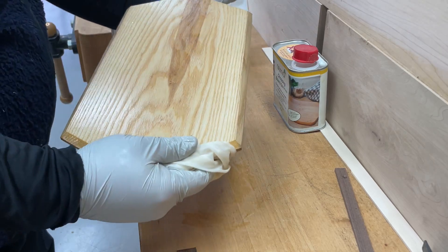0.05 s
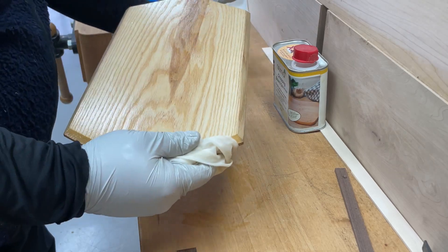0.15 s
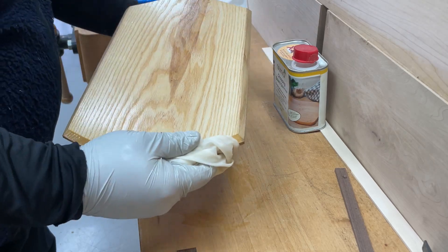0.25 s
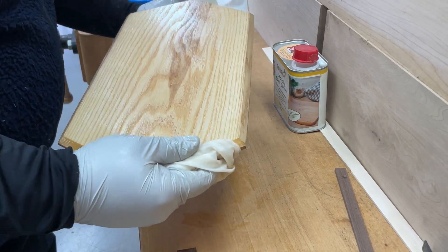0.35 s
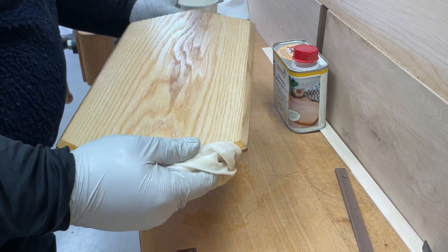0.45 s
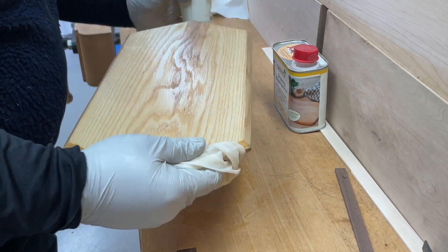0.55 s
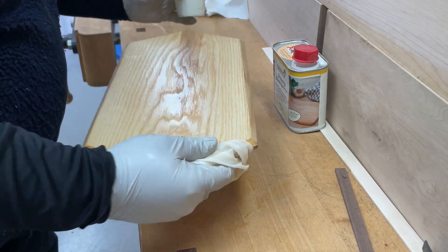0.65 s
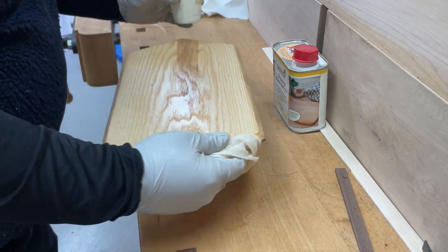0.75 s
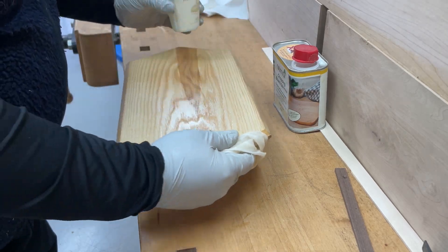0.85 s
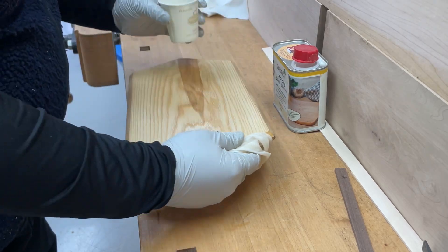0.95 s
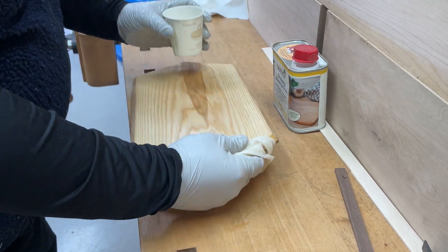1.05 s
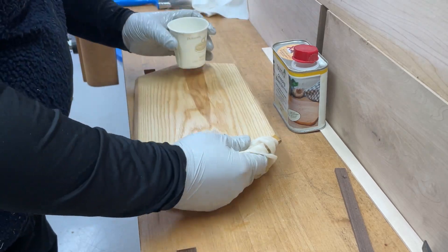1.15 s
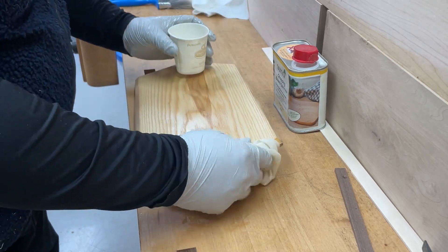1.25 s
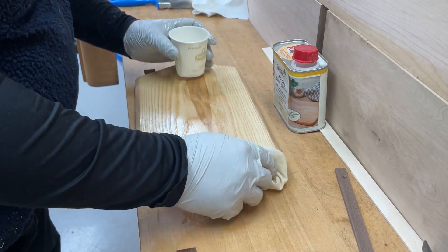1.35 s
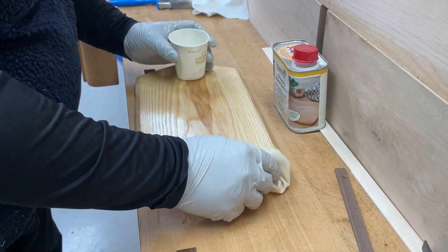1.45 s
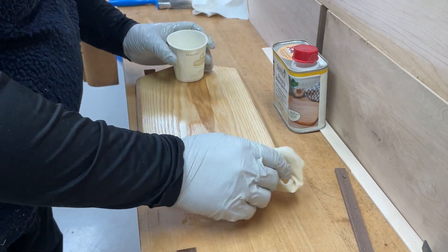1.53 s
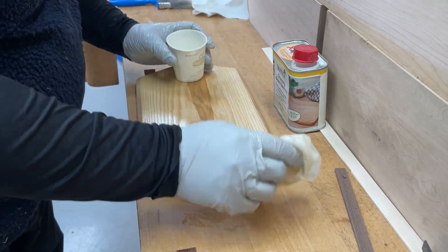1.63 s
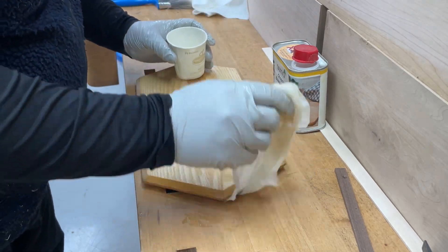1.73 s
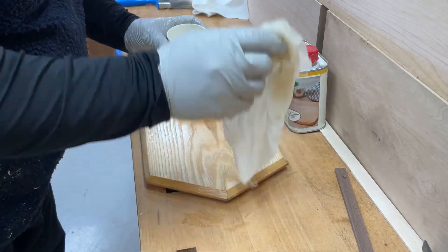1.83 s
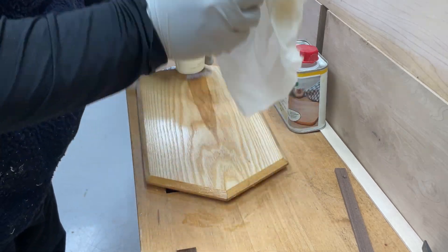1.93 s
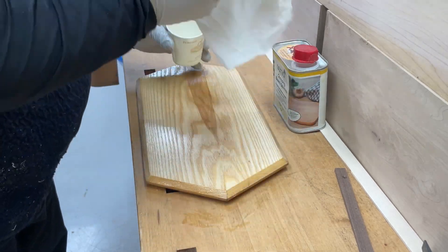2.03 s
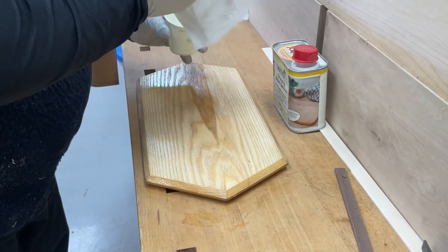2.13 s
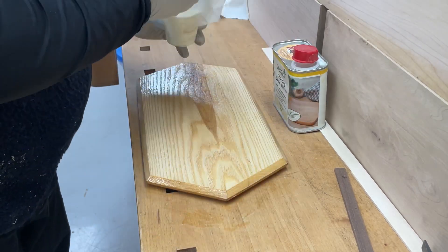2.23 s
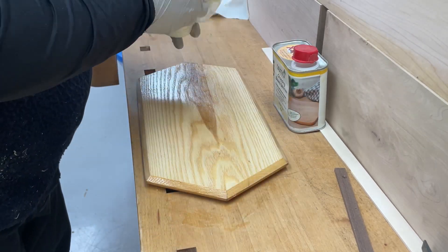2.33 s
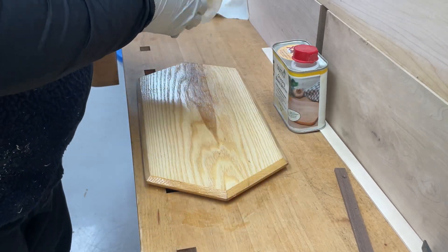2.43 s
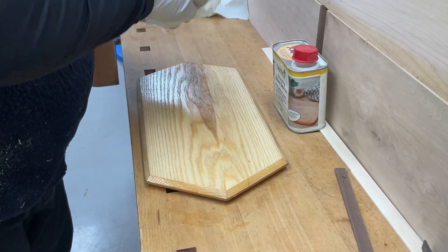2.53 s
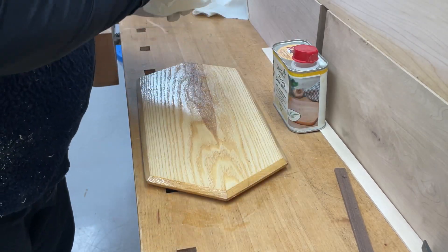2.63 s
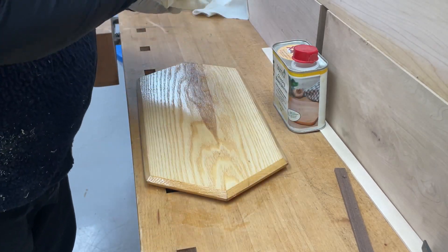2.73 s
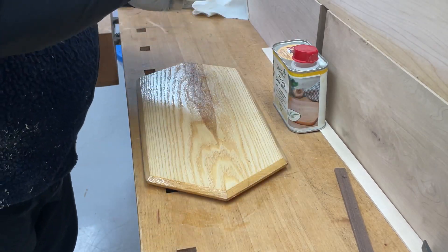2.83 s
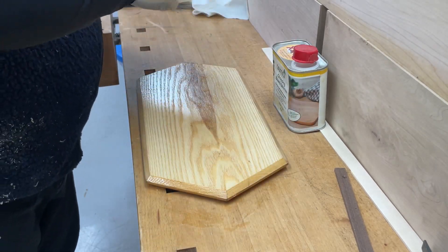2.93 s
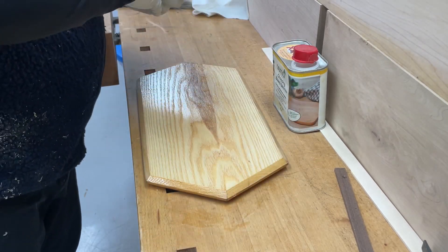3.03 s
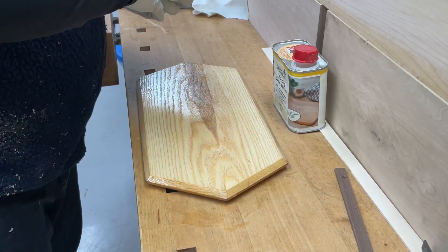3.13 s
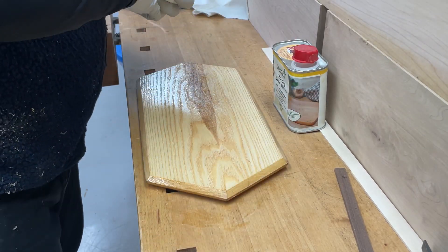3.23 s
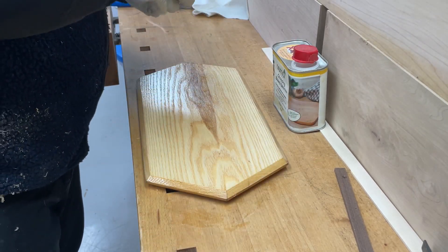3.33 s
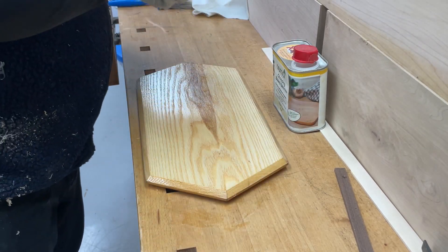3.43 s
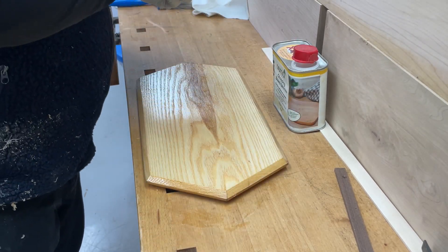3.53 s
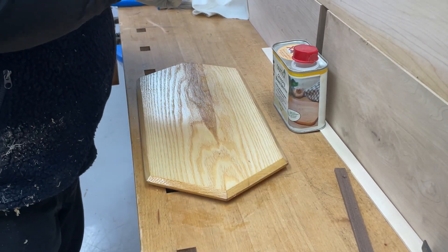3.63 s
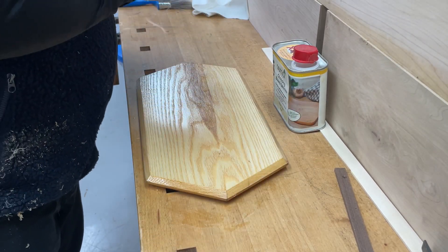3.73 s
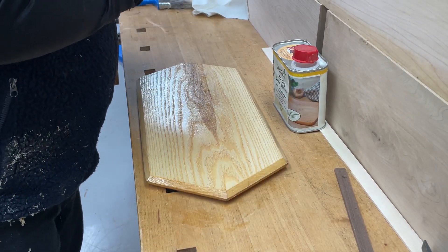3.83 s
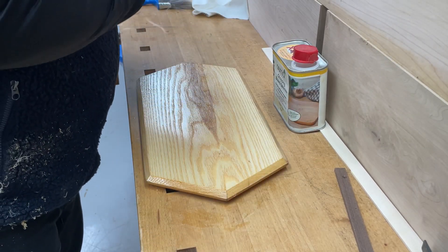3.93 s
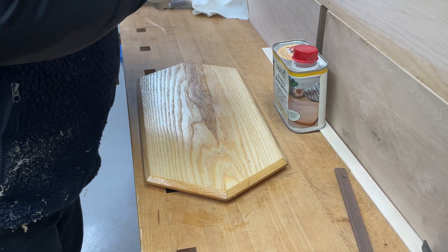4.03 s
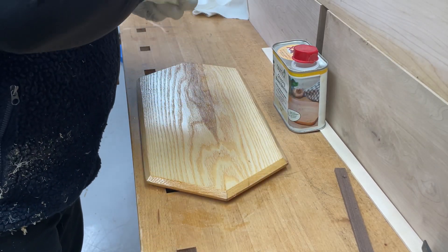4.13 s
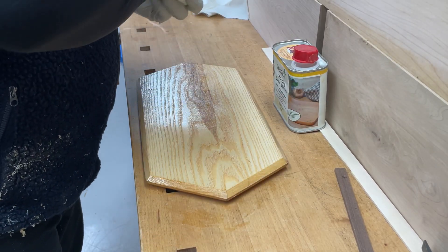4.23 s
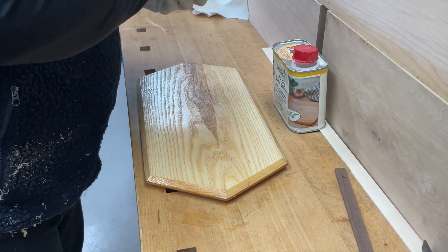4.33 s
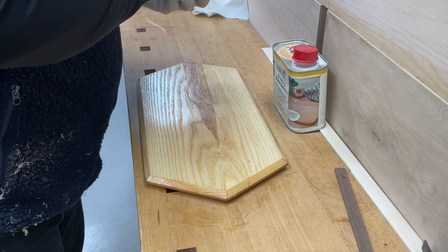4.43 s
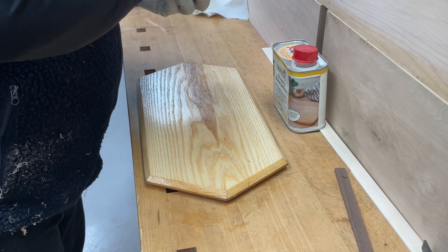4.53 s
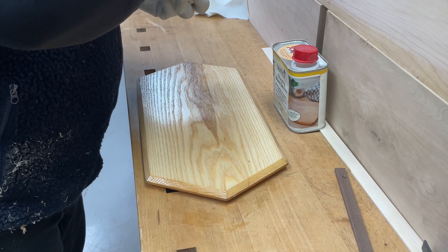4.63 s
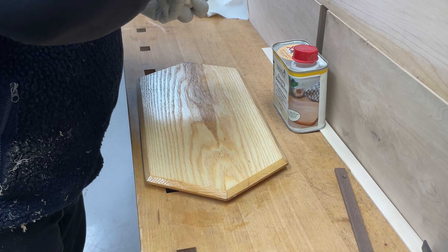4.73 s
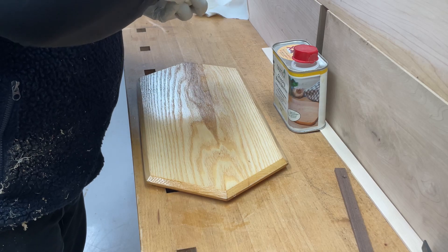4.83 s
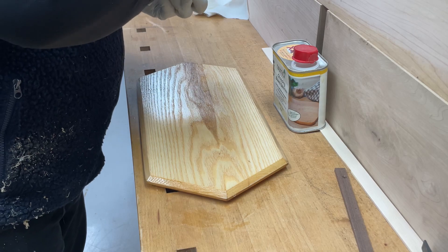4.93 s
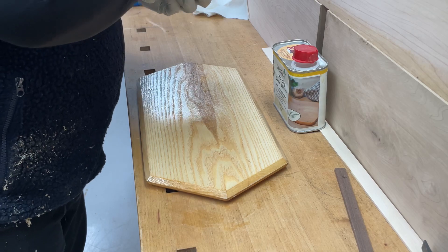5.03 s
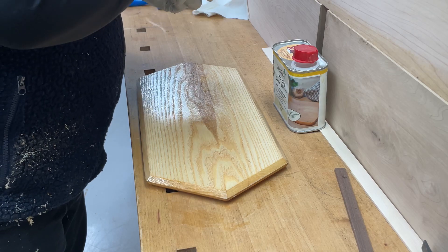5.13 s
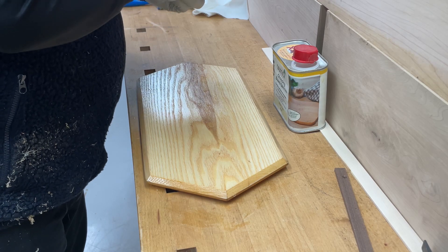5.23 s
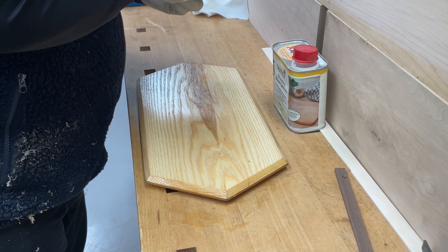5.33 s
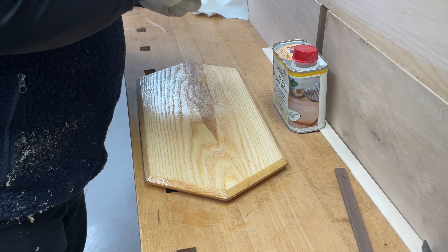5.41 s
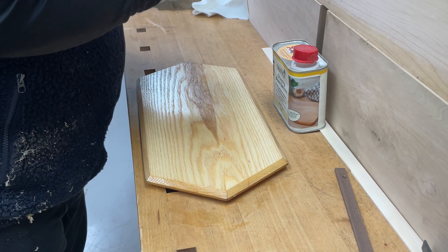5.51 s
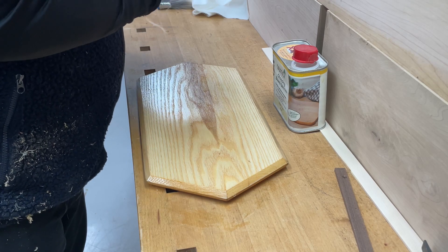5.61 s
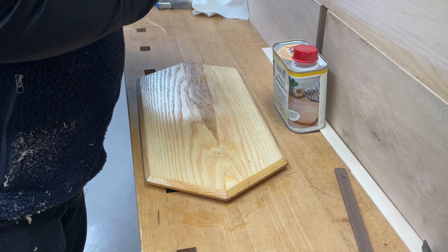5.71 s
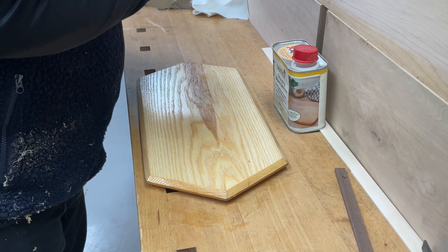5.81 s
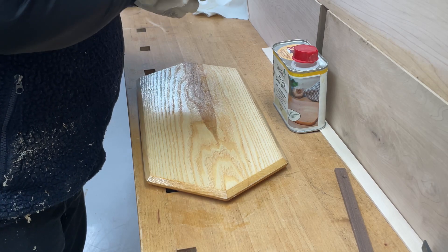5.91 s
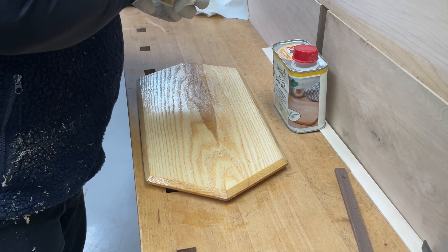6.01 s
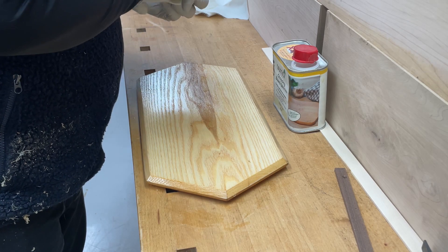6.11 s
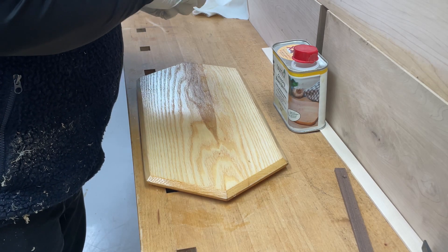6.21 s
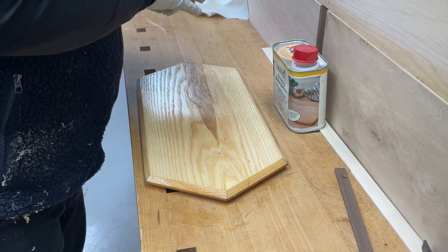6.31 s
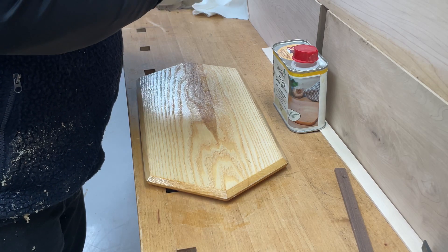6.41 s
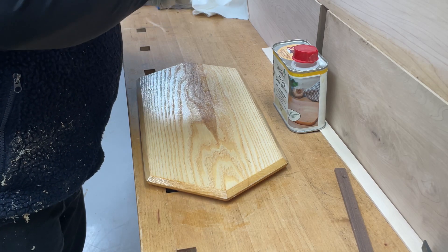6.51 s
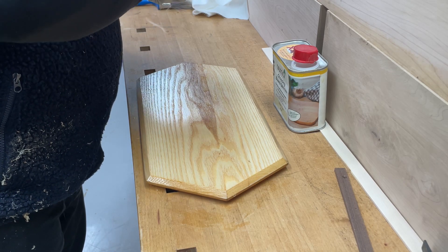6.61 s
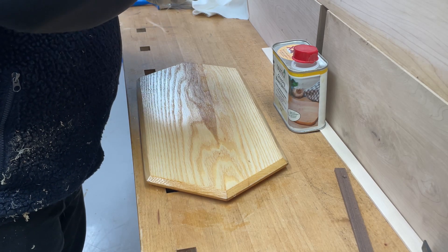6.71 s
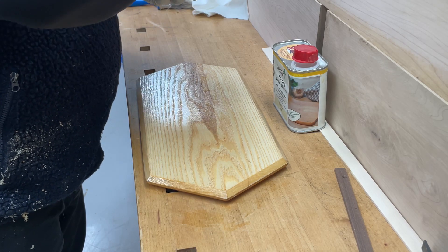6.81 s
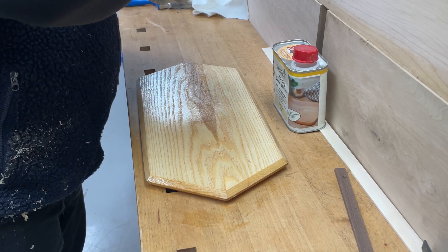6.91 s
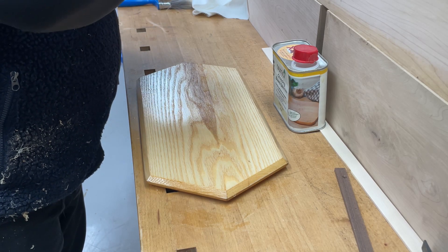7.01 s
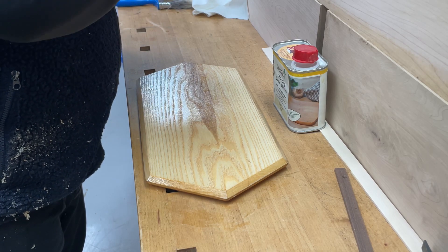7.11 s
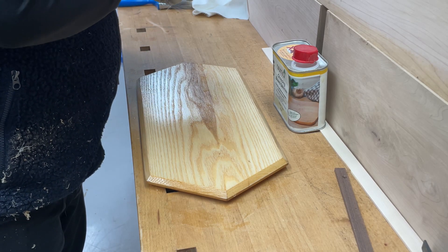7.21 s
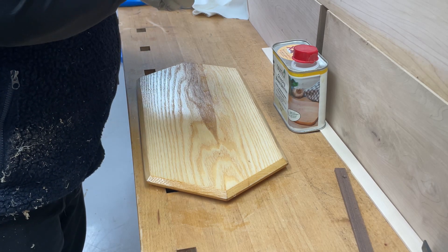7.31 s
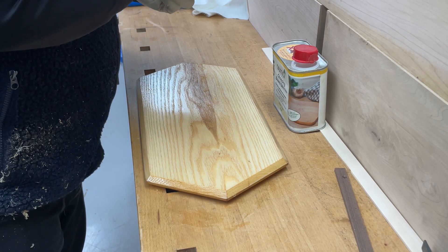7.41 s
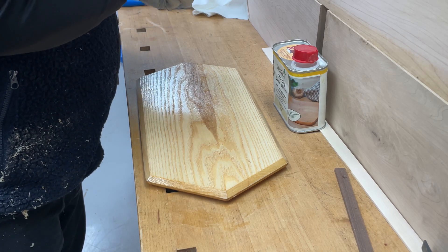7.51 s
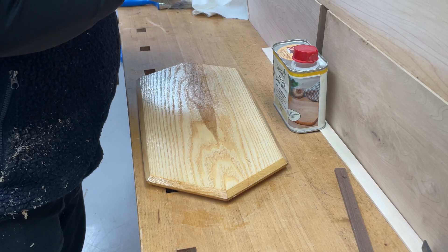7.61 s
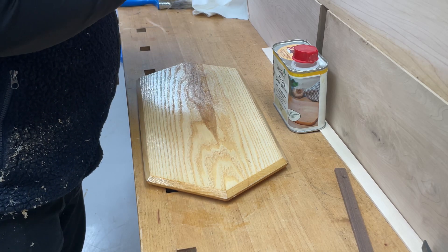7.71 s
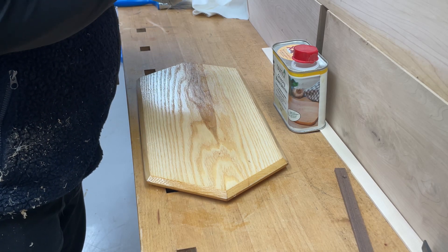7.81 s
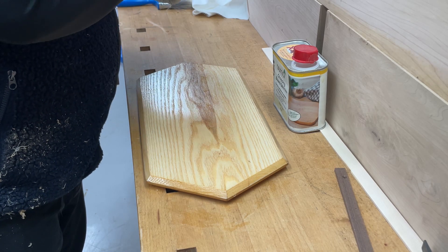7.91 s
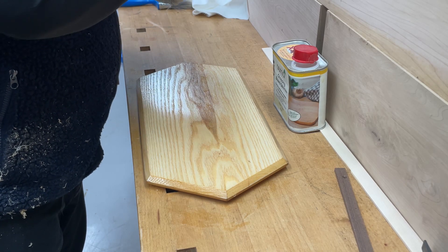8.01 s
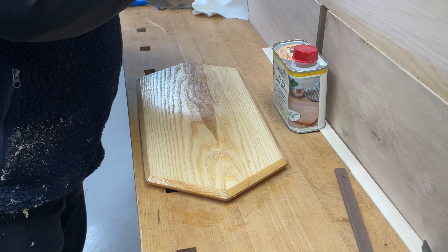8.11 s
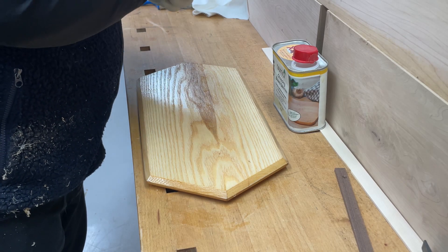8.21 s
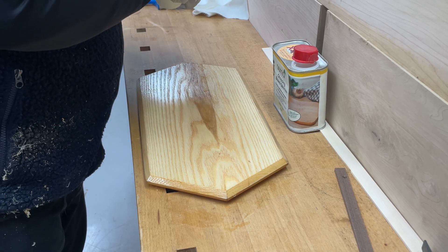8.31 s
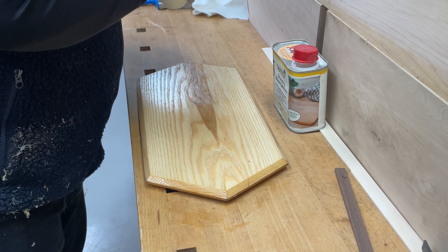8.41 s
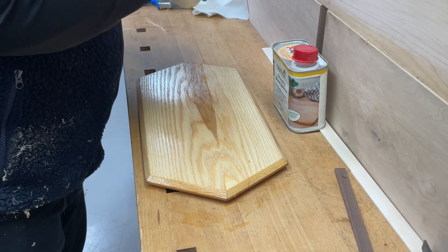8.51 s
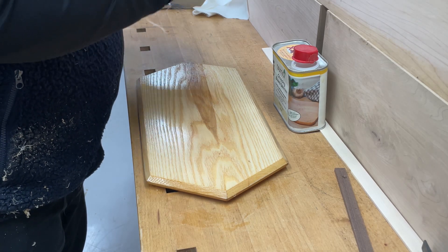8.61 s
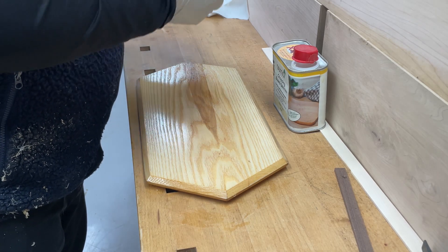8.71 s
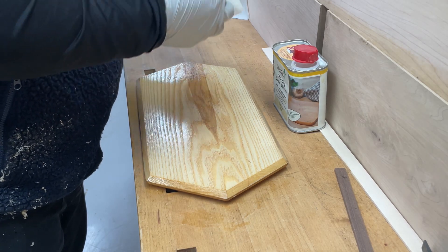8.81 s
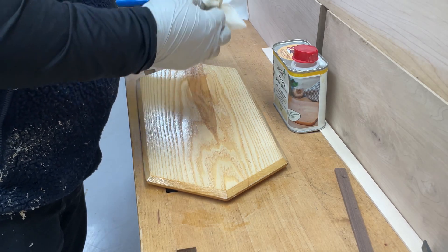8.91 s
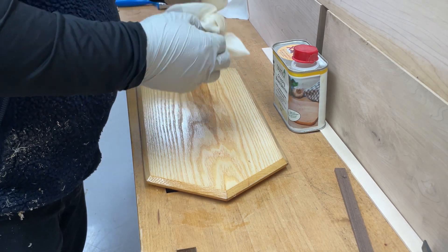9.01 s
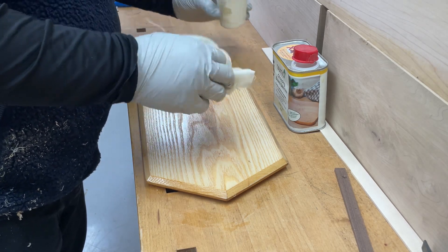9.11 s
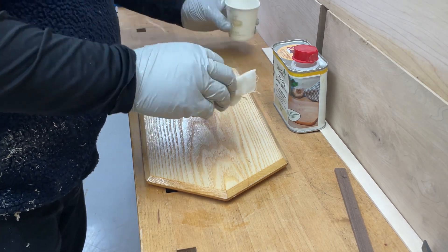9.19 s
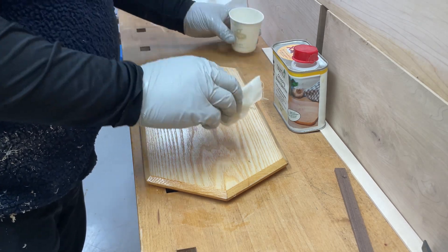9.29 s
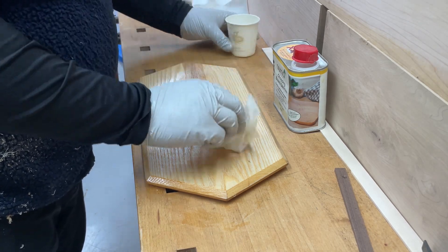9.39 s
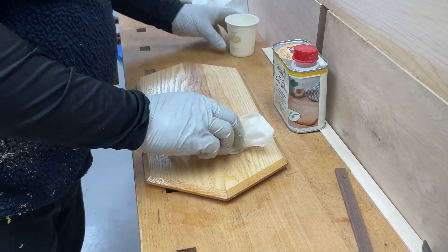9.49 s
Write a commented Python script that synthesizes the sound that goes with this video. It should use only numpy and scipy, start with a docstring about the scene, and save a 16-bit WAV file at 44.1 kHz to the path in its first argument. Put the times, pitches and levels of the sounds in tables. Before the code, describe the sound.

A board clatters onto a bench and a hand thumps, followed by soft cloth rustling and a paper cup tapping down over low hum.

```python
"""Cloth rustles and sleeves shuffle over the hum of machinery in a small workshop. A wooden board
bounces to rest on the bench; a hand thumps and wipes it, driving the bench modes. The cloth is
unfolded, wetted from a paper cup and crumpled in gloved hands: slipping fibres and snapping creases,
with small ticks and bumps. Last, the cup is put down and rocks. Blows ring as damped modes,
rubbing is shaped noise. A close pair of microphone ports hears it."""
import sys
import numpy as np
from scipy import signal
from scipy.fft import rfft, irfft
from scipy.io import wavfile

SR = 44100
rng = np.random.default_rng(int(sys.argv[2]) if len(sys.argv) > 2 else 0)


def generate_wav(sig):
    """Save sig (samples, or channels by samples) to the path in sys.argv[1] as 16-bit PCM at SR."""
    pcm = np.round(np.clip(np.atleast_2d(sig).T, -1, 1) * 32767).astype(np.int16)
    wavfile.write(sys.argv[1], SR, pcm)


N = 421155
TIME_S = np.arange(N) / SR
BIN_HZ = np.maximum(np.arange(N // 2 + 1) * SR / N, 1)
AIR_DB, ROOM_DB, CUP_PAN_DB, CUTOFF_HZ = -56, -12.5, -2.5, 16050

# Table levels are relative.
# machinery hum lines: (frequency [Hz], level [dB], waver [dB])
HUM_LINES = [(25, -73, 1.5), (36.5, -64.5, 3.0), (50.1, -52.5, 1.5), (74.84, -59, 3.0), (88.6, -62, 4.0),
             (99.9, -61, 2.5)]
# far motor under changing load: (time [s], frequency [Hz], level [dB])
MOTOR_CURVE = [(4.5, 61.9, -69), (4.85, 58.8, -51), (5.1, 57.9, -58), (5.35, 57, -50.5), (6.3, 57.65, -50),
               (6.6, 59, -60), (7.4, 59.1, -57), (8.1, 57.9, -58), (8.35, 55.6, -47.5), (9.0, 55.6, -48),
               (9.55, 57.5, -55)]
# room air: (frequency [Hz], density [dB])
AIR_SPECTRUM = [(22, -11), (50, -2.5), (100, -3), (130, -6), (340, -12), (600, -22.5), (1000, -13),
                (1900, -13), (3000, -24), (5500, -34.5), (7000, -34.5), (16000, -66)]
# room decay: (frequency [Hz], t60 [s])
ROOM_T60_S = [(100, 0.52), (700, 0.69), (2000, 0.36), (8000, 0.068)]
# sleeves and body against the bench: (time [s], level [dB])
SHUFFLE_CURVE = [(0.0, -52.5), (0.45, -61), (1.04, -59), (1.2, -38.5), (1.3, -48.5), (1.46, -41.5),
                 (1.86, -56.5), (1.99, -60), (4.95, -57.5), (5.61, -60.5), (5.8, -55), (6.78, -56.5),
                 (7.42, -52), (7.66, -60), (8.56, -56), (8.7, -53), (9.15, -59.5), (9.42, -57),
                 (9.55, -46.5)]
# shuffle colour: (frequency [Hz], density [dB])
SHUFFLE_SPECTRUM = [(65, -54), (110, -11), (183, -3), (257, -6), (352, -8), (445, -9.5), (571, -7),
                    (2500, -23), (3250, -44), (5500, -120)]
# hand dragging on the bench: (time [s], level [dB])
DRAG_CURVE = [(1.36, -44), (1.38, -22.5), (1.4, -22.5), (1.436, -28.5), (1.506, -33.5), (1.53, -29),
              (1.95, -58.5)]
# hand, board and cup striking the bench: (time [s], level [dB], contact hardness [Hz])
HAND_HITS = [(1.371, -15.5, 300), (1.385, -25.5, 300), (1.53, -24.5, 300)]
BOARD_HITS = [(1.006, -22.5, 3000), (1.013, -3.5, 2500), (1.082, -18, 1480), (1.167, -20, 1080),
              (1.187, -21, 900), (1.205, -26, 1190), (1.225, -29.5, 900), (1.245, -29, 900),
              (1.272, -36, 900), (1.557, -37.5, 800)]
CUP_HITS = [(9.364, -16, 3020), (9.396, -18, 3060), (9.447, -27, 3030), (9.468, -28, 3000)]
# resonances: (frequency [Hz], level [dB], t60 [s])
BENCH_MODES = [(101.7, 1, 0.21), (92.3, -5, .25), (112, -7, .25), (139, -12, 0.18), (170, -12, 0.14),
               (42, -16, 0.46), (392, -23, .1)]
BOARD_MODES = [(108, -21.5, .07), (231, -4.5, 0.024), (427, -12.5, 0.035), (500, -20, 0.093),
               (707, -8, 0.093), (763, -14.5, 0.098), (953, -17, 0.11), (1250, -1, 0.0085),
               (1213, -5.5, 0.023), (1411, -14, 0.089), (1583, -10, 0.048), (1730, -7, 0.036),
               (1785, 2.5, 0.01), (2820, -18, 0.025), (3055, -27, 0.11)]
CUP_MODES = [(420, -20.5, 0.047), (699, -5, 0.054), (906, -2, 0.013), (970, -7, 0.072), (1310, -3.5, 0.028),
             (1500, -6, 0.016), (2197, -11, 0.013), (2800, -13.5, 0.014), (6840, -6, 0.0095)]
# ticks of glove, cloth and cup: (time [s], level [dB], pitch [Hz], t60 [s])
TICK_EVENTS = [(1.808, -23.5, 2160, 0.0065), (3.125, -49, 2200, .015), (3.217, -35, 2540, 0.011),
               (3.286, -30.5, 1870, 0.019), (3.357, -27.5, 2090, 0.017), (3.626, -26.5, 7100, 0.0068),
               (3.627, -33, 4600, .006), (4.762, -18, 2170, 0.0065), (4.763, -23.5, 1055, 0.034),
               (6.212, -36, 2236, 0.016), (6.876, -39, 600, .03), (7.151, -30.5, 906, 0.035),
               (7.347, -33, 172, 0.032), (7.43, -34, 1290, .02), (8.668, -34, 1900, .01),
               (8.669, -38, 3480, .008)]
# bench bumps, cloth crinkles: (time [s], level [dB], centre [Hz], width [octaves], rise [s], t60 [s])
BUMP_BURSTS = [(.55, -44, 300, 2.4, 0.018, 0.41), (3.6, -36.5, 1250, 0.38, .01, 0.23),
               (4.17, -43.5, 351, 0.27, 0.016, 0.33), (4.18, -39, 1190, .6, 0.024, 0.46),
               (4.26, -47.5, 168, .6, 0.025, 0.9), (5.687, -43, 162, 0.54, .004, 0.52),
               (5.688, -41, 696, 2.5, 0.0017, 0.28), (5.75, -45, 500, 1.2, .005, .3),
               (6.85, -48, 600, .6, 0.0089, 0.26), (7.36, -50, 170.4, 0.68, .01, .5),
               (8.0, -49.5, 229, 0.26, 0.015, 0.51), (8.035, -44, 696, 1.2, 0.0023, .12),
               (8.79, -39.5, 301, 0.087, .015, .45), (9.155, -48, 700, 1.2, .004, 0.24),
               (9.49, -35, 200, 0.38, 0.032, .9)]
CRINKLE_BURSTS = [(.06, -47, 6800, 0.21, .01, .1), (.25, -54, 7450, .02, 0.055, .8),
                  (.1, -50, 4200, .5, .08, 1), (.12, -54, 2500, .3, .08, .8),
                  (1.345, -42, 2200, 3.0, .03, .7), (1.367, -43, 1470, 0.35, .008, 0.21),
                  (2.35, -51, 6000, 2.1, .002, 0.11), (3.626, -54, 5000, 3, .001, 0.13),
                  (6.285, -47, 2820, 0.16, 0.00091, 0.18), (6.286, -46.5, 3900, .12, .001, 0.33),
                  (6.287, -46, 5300, 0.16, .002, .35), (6.814, -39, 4640, 0.84, .001, .15),
                  (8.667, -44.5, 2570, 2.2, .001, 0.13)]
# cloth in the hands: (time [s], fine rustle [dB], hollow rustle [dB])
CLOTH_CURVE = [(0.0, -73, -62), (0.05, -61.5, -60), (0.21, -53, -52.5), (0.37, -73, -67.5),
               (0.77, -79, -69), (0.98, -78, -83), (1.01, -64.5, -62), (1.12, -72, -56), (1.2, -57, -64),
               (1.3, -61.5, -67), (1.38, -49, -37.5), (1.46, -56.5, -44.5), (1.65, -57.5, -66),
               (1.78, -51, -50), (1.83, -49, -57), (1.89, -74.5, -71), (1.94, -80, -74), (1.99, -59, -76),
               (2.15, -73.5, -76), (2.34, -64, -55), (2.36, -53, -54), (2.39, -59.5, -57),
               (2.55, -68.5, -72), (2.63, -64, -68), (2.69, -54.5, -60), (2.74, -60.5, -59),
               (2.85, -62, -60.5), (2.93, -52, -56.5), (3.16, -63.5, -58.5), (3.43, -56.5, -58),
               (3.46, -64.5, -73), (3.56, -63.5, -68), (3.64, -48.5, -52), (3.72, -63.5, -60),
               (3.83, -69, -62), (4.01, -52.5, -54), (4.12, -53.5, -55.5), (4.26, -59.5, -55.5),
               (4.47, -72.5, -76), (4.6, -56.5, -59), (4.68, -58.5, -69.5), (4.73, -71, -69),
               (4.76, -61.5, -66), (4.81, -59, -53.5), (4.95, -67, -64), (5.03, -56.5, -56),
               (5.08, -69.5, -63), (5.18, -46, -50.5), (5.32, -59.5, -55), (5.42, -49.5, -49.5),
               (5.48, -56, -54), (5.56, -52.5, -57.5), (5.64, -68.5, -59), (5.77, -54, -49.5),
               (5.85, -51.5, -54), (5.96, -51, -51), (6.04, -65, -60), (6.22, -51.5, -57),
               (6.28, -64.5, -56), (6.3, -55, -52), (6.41, -63.5, -54), (6.49, -53.5, -58.5),
               (6.65, -68, -65), (6.7, -57, -57), (6.78, -62.5, -58.5), (6.83, -58, -53.5),
               (6.97, -64.5, -58), (7.07, -52.5, -59), (7.13, -57.5, -61), (7.15, -50.5, -53),
               (7.29, -64, -57), (7.34, -50.5, -52), (7.39, -64.5, -57), (7.5, -52, -60),
               (7.61, -69, -61.5), (7.85, -65.5, -67), (7.95, -54, -71), (8.01, -65, -61),
               (8.16, -64.5, -61), (8.3, -54, -61), (8.35, -66.5, -69), (8.51, -58, -78), (8.56, -68, -64),
               (8.78, -61.5, -60), (9.02, -74.5, -91), (9.1, -64, -67), (9.34, -74.5, -75),
               (9.36, -52.5, -61), (9.42, -58.5, -52), (9.52, -69, -69), (9.55, -67, -66)]
# fine rustle: (frequency [Hz], density [dB])
RUSTLE_SPECTRUM = [(1500, -31), (2600, -8), (4000, -9.5), (5700, -4.5), (7000, -2.5), (8600, -1),
                   (10500, -7), (12500, -11.5), (16000, -15)]
# cavity of cupped hands: (centre [Hz], width [Hz], level [dB])
CAVITY_PEAKS = [(2270, 540, 3), (3440, 2700, -8.5), (1500, 980, -1)]
# likeness of noise at the ports: (frequency [Hz], coherence [ratio, clipped to 0-1 in use])
PORT_COHERENCE = [(60, 1.17), (300, 0.69), (850, -0.2), (1400, 0.15), (2300, 0.14), (3300, 0.7), (5000, .4),
                  (6500, 0.9), (8000, 1.4), (16000, 1.85)]
# port phase, a path difference in the treble: (frequency [Hz], left lead [rad])
PORT_LEAD_RAD = [(150, 0), (500, .3), (1400, 3.1), (2300, .6), (4700, .9), (5700, 2.9), (6900, 1.0),
                 (8600, 3.14), (10750, 6.28), (12900, 9.42), (15050, 12.57), (16500, 14.7)]
# extra phase of blows from the bench side: (frequency [Hz], left lead [rad])
BENCH_LEAD_RAD = [(150, -2.5), (500, -0.2), (1250, -1.5), (1600, -0.54)]
# port balance: (frequency [Hz], left minus right [dB])
PORT_BALANCE_DB = [(60, 1.5), (700, -0.2), (2300, 1), (3500, -1.2), (5100, 3), (6200, -4.5), (7000, -3),
                   (8500, -0.3)]


def from_db(db):
    """Decibels to gain."""
    return 10 ** (np.asarray(db) / 20)


def unit_rms(x):
    """Scale to rms 1."""
    return x / np.sqrt(np.mean(x ** 2) + 1e-20)


def in_time(rows):
    """Curve columns, one value per sample."""
    times_s, *columns = np.transpose(rows)
    return [np.interp(TIME_S, times_s, column) for column in columns]


def at_hz(points, hz=BIN_HZ):
    """Table read on a log-frequency axis."""
    points_hz, values = np.transpose(points)
    return np.interp(np.log(hz), np.log(points_hz), values)


def drift(rate_hz):
    """Slow random wander, rms 1."""
    pole = np.exp(-80 * np.pi * rate_hz / SR)   # one step per 40 samples
    slow = signal.lfilter([1], [1, -2 * pole, pole * pole], rng.standard_normal(N // 40 + 4002))[4000:]
    return np.interp(np.arange(N) / 40, np.arange(len(slow)), unit_rms(slow))


def ring(x, hz, t60_s):
    """One damped mode driven by x."""
    radius, step_rad = from_db(-60 / (t60_s * SR)), 2 * np.pi * hz / SR
    return signal.lfilter([0, np.sin(step_rad)], [1, -2 * radius * np.cos(step_rad), radius ** 2], x + 1e-18)


def spread(pair, gain):
    """Two independent noises, coloured and mixed to the port coherence; rms 1."""
    mid, side = rfft(pair) * gain
    coherence = np.clip(at_hz(PORT_COHERENCE), 0, 1)
    spectra = np.sqrt(1 + coherence) * mid + np.sqrt(1 - coherence) * side * [[1], [-1]]
    return unit_rms(irfft(spectra, N))


def steer(x, lead_rad, balance_db=0):
    """Left-right phase and level offset by frequency, half per side."""
    half = from_db(balance_db / 2) * np.exp(.5j * at_hz(lead_rad))
    return irfft(rfft(x) * [half, 1 / half], N)


def fibres(flutter_db, snaps_per_s, crackle_db):
    """Fibres slip as fluttering noise; creases snap as clumped clicks."""
    sizes = from_db(3.7 * np.minimum(rng.exponential(1, (2, N)), 5))
    signs = rng.choice([-1, 1], (2, N))
    snapping = rng.random(N) < snaps_per_s * from_db(5 * drift(8)) / SR
    flutter = from_db(flutter_db * (drift(8.4) + drift(34)))
    return flutter * rng.standard_normal((2, N)) + from_db(crackle_db) * unit_rms(sizes * signs * snapping)


def bursts(rows, shared):
    """Band noise that swells and dies, partly common to both ports."""
    out = np.zeros((2, N))
    for time_s, db, hz, octaves, rise_s, t60_s in rows:
        start = round(time_s * SR)
        t = TIME_S[:min(int(t60_s * SR), N - start)]
        edges_hz = hz * 2 ** (np.array([-.5, .5]) * octaves)
        white = rng.standard_normal((3, len(t) + 4000))
        band = signal.sosfilt(signal.butter(2, edges_hz, "band", fs=SR, output="sos"), white)[:, 4000:]
        pair = unit_rms(shared * band[2] + (1 - shared) * band[:2])
        envelope = from_db(db - 60 * t / t60_s) * (1 - np.exp(-t / rise_s))
        out[:, start:start + len(t)] += envelope * pair
    return out


def struck(hits, modes, gain_db, lag_cycles):
    """Each hit is a soft-edged push into all modes; low bending waves arrive later."""
    out = np.zeros(N)
    scatter_db = rng.normal(0, 2, (len(hits), len(modes)))
    for (time_s, hit_db, hardness_hz), offsets_db in zip(hits, scatter_db):
        for (hz, mode_db, t60_s), offset_db in zip(modes, offsets_db):
            start = round((time_s + lag_cycles / hz) * SR)
            t = TIME_S[:min(int(t60_s * SR), N - start)]
            swell = 1 - np.exp(-t * hz * 1.14)
            decay = from_db(hit_db + gain_db + mode_db + offset_db - 60 * t / t60_s)
            rolloff = 1 / np.hypot(1, (hz / hardness_hz) ** 2)
            out[start:start + len(t)] += rolloff * swell * decay * np.sin(2 * np.pi * hz * t)
    return out


def machinery():
    """Wavering hum lines and a far motor whose pitch follows its load."""
    hum = sum(from_db(db + waver_db * drift(1.45)) * np.sin(2 * np.pi * (hz * TIME_S + rng.random()))
              for hz, db, waver_db in HUM_LINES)
    motor_hz, motor_db = in_time(MOTOR_CURVE)
    running = TIME_S > MOTOR_CURVE[0][0]
    motor = running * from_db(motor_db) * np.sin(2 * np.pi * np.cumsum(motor_hz) / SR)
    return np.sqrt(2) * (hum + motor)


def air():
    """Room air: low, slightly wavering noise."""
    noise = from_db(1.7 * drift(5.1)) * rng.standard_normal((2, N))
    return from_db(AIR_DB) * spread(noise, from_db(at_hz(AIR_SPECTRUM)))


def room(x):
    """Reverberation: a noise tail dying band by band, mostly independent per channel."""
    t, tail = TIME_S[:SR], 0
    for low_hz in 60 * 2. ** np.arange(8):
        octave = signal.butter(2, [low_hz, 2 * low_hz], "band", fs=SR, output="sos")
        band = signal.sosfilt(octave, rng.standard_normal((3, SR)))
        decay = from_db(-60 * t / at_hz(ROOM_T60_S, low_hz * np.sqrt(2)))
        tail = tail + (band[:2] + 0.46 * band[2]) * decay
    tail *= np.clip((t - .003) / 0.0027, 0, 1)   # first walls answer after 3 ms
    tail /= np.sqrt(np.sum(tail[0] ** 2))
    return from_db(ROOM_DB) * signal.fftconvolve(x[None], tail, axes=1)[:, :N]


def shuffle():
    """Dull, lumpy rubbing of clothes."""
    rubbing = fibres(flutter_db=2.5, snaps_per_s=60, crackle_db=-10)
    return from_db(in_time(SHUFFLE_CURVE)[0]) * spread(rubbing, from_db(at_hz(SHUFFLE_SPECTRUM)))


def hand():
    """Thumps excite the bench modes; drag friction keeps them rumbling."""
    thumps = struck(HAND_HITS, BENCH_MODES, gain_db=1.5, lag_cycles=.2)
    dragging = (TIME_S > DRAG_CURVE[0][0]) & (TIME_S < DRAG_CURVE[-1][0])
    rumble = sum(from_db(db) * unit_rms(ring(rng.standard_normal(N), hz, t60_s))
                 for hz, db, t60_s in BENCH_MODES)
    return thumps + dragging * from_db(in_time(DRAG_CURVE)[0] - 1) * unit_rms(rumble)


def ticks():
    """A short noisy contact rings a close pair of modes and a weaker overtone."""
    out = np.zeros(N)
    for time_s, db, hz, t60_s in TICK_EVENTS:
        start = round(time_s * SR)
        t = TIME_S[:int(1.5 * t60_s * SR) + 200]
        roughness = 1 + 1.2 * rng.standard_normal(len(t))
        contact = np.sin(2 * np.pi * hz * t) * np.exp(-t * hz * 2.7) * roughness
        body = ring(contact, hz * 0.953, t60_s) + ring(contact, hz * 1.1, t60_s * 0.87)
        body += .3 * ring(contact, hz * 1.7, t60_s * 0.49)
        out[start:start + len(t)] += from_db(db) * body / np.abs(body).max()
    return out


def cup():
    """Paper cup lands and rocks, ringing briefly, right of centre."""
    pan = from_db([[CUP_PAN_DB / 2], [-CUP_PAN_DB / 2]])
    return pan * struck(CUP_HITS, CUP_MODES, gain_db=-1.1, lag_cycles=0.24)


def board():
    """Wooden board bounces and rocks to rest; each contact rings its modes."""
    return struck(BOARD_HITS, BOARD_MODES, gain_db=0.43, lag_cycles=2.2)


def cloth():
    """Bright fibre rustle, plus a hollow one coloured by the cavity of the hands."""
    fine_db, hollow_db = in_time(CLOTH_CURVE)
    cavity = sum(from_db(db) / (1 + (2 * (BIN_HZ - hz) / width_hz) ** 2) for hz, width_hz, db in CAVITY_PEAKS)
    bright = from_db(at_hz(RUSTLE_SPECTRUM))
    fine = spread(fibres(flutter_db=1.34, snaps_per_s=300, crackle_db=-12.5), bright)
    hollow = spread(fibres(flutter_db=1.5, snaps_per_s=150, crackle_db=-12), cavity)
    return from_db(fine_db + 5) * fine + from_db(hollow_db) * hollow


def scene():
    """Stereo mix; only cup, board and ticks excite the room."""
    blows = steer(cup() + board(), BENCH_LEAD_RAD) + ticks()
    soft = hand() + bursts(CRINKLE_BURSTS, shared=0.5) + bursts(BUMP_BURSTS, shared=0.7)
    return blows + room(blows.mean(axis=0)) + soft + cloth() + shuffle() + machinery() + air()


def record(dry):
    """Port phase and level differences, then a steep low-pass."""
    ports = steer(dry, PORT_LEAD_RAD, at_hz(PORT_BALANCE_DB))
    return signal.sosfilt(signal.cheby2(24, 70, CUTOFF_HZ, fs=SR, output="sos"), ports)


dry = scene()
out = record(dry)
generate_wav(out)
```